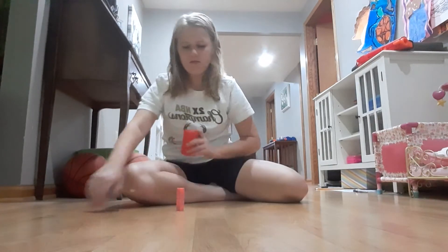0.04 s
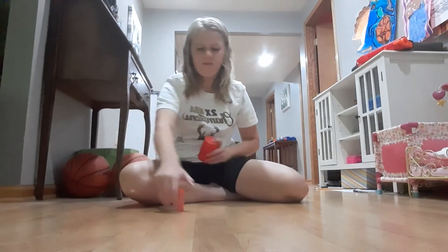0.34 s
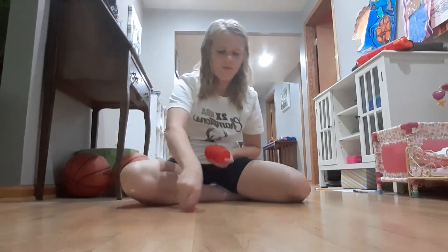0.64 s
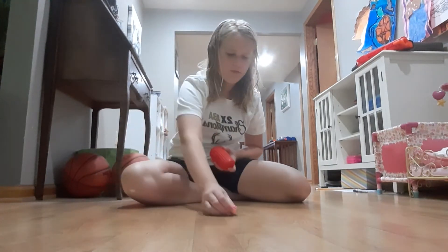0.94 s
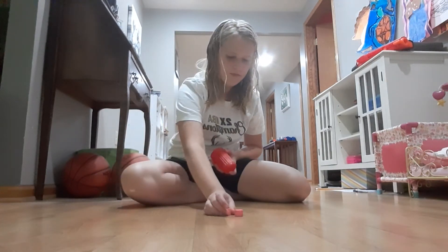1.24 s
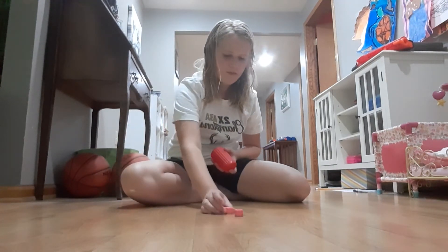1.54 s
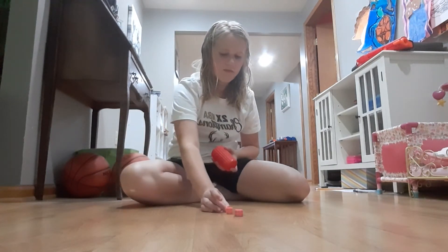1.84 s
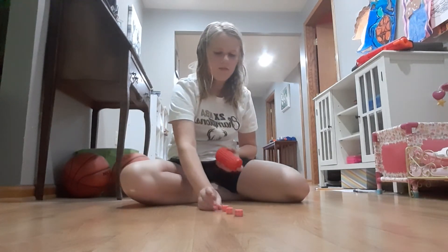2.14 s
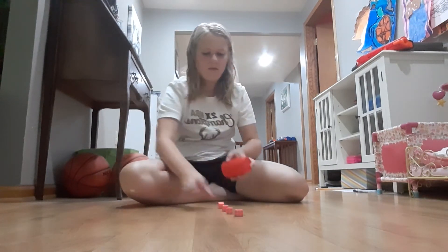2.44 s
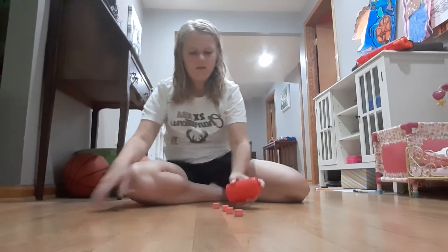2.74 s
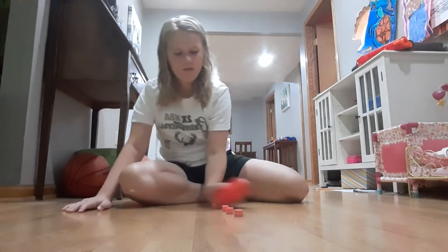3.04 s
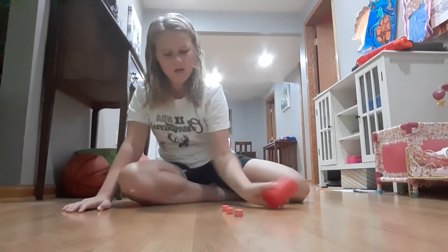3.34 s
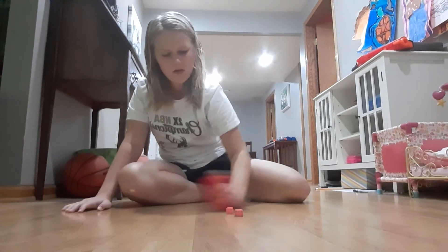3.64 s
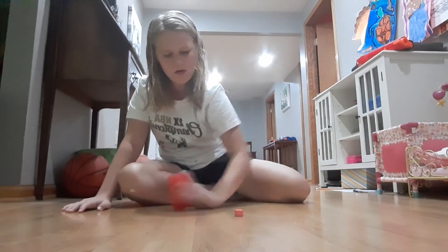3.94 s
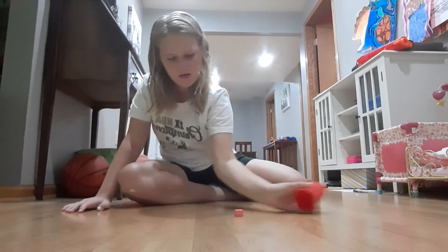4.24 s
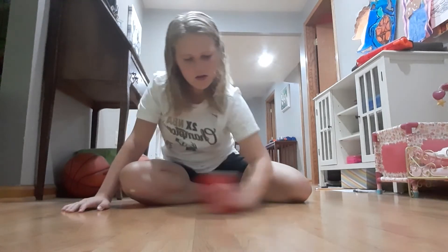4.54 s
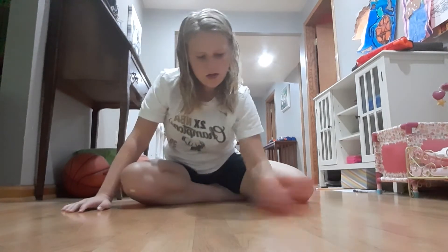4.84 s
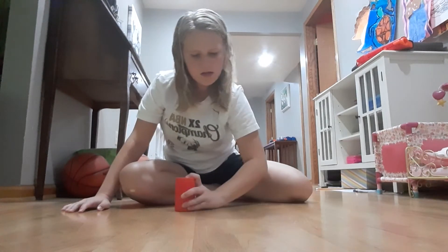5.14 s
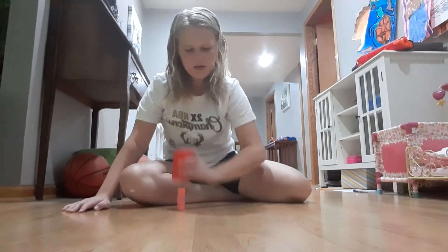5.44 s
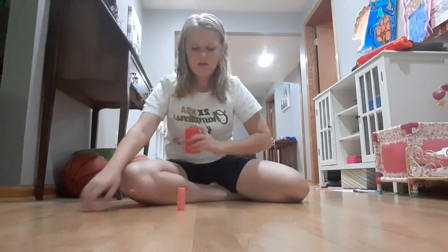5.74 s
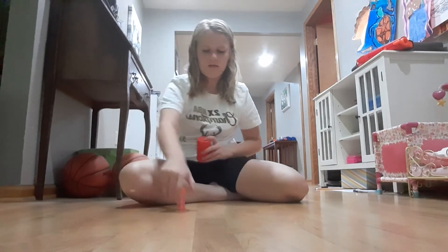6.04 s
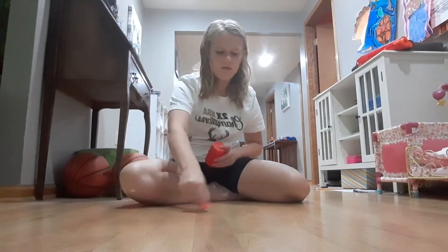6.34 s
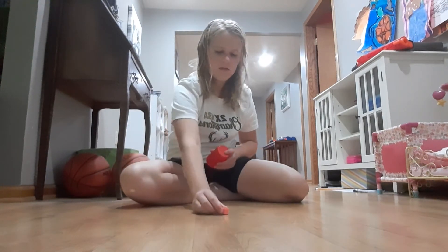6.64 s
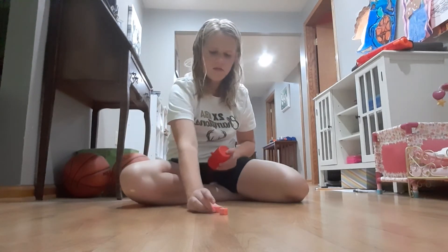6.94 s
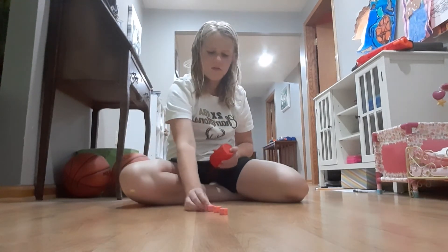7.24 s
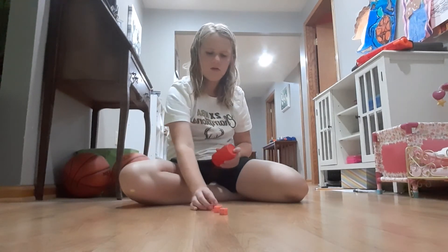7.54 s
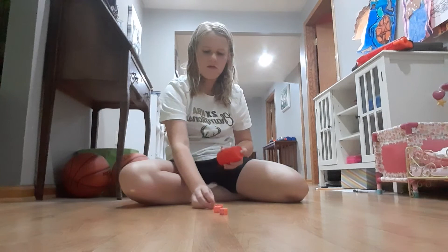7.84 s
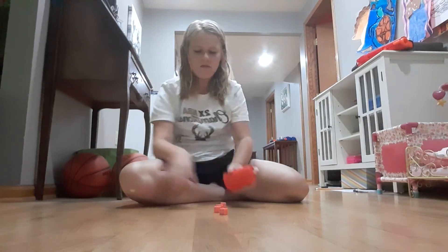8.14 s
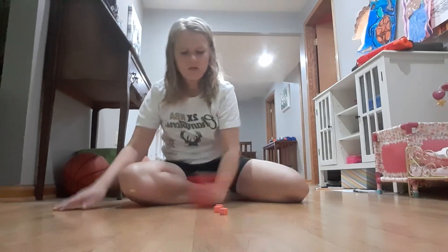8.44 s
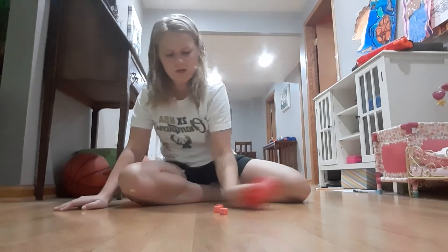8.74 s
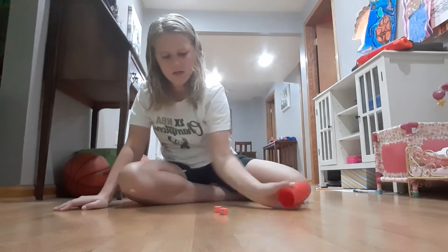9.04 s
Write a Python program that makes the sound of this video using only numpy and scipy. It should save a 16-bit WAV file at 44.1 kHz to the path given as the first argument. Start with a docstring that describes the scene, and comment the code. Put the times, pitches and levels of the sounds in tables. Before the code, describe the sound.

Over a faint house hush and hum, a couple of soft touches on a wooden floor come at about 0.5 seconds. From 0.9 to 1.5 seconds dice click on the boards in a quick cluster, followed by lighter taps and slides until 2.7. At about 3 seconds a plastic cup starts scraping across the floor in quick strokes, roughly two a second, with dice rattling loudly inside: hollow knocks and sharp plastic cracks, with faint low thuds of shifting weight beneath. The cup settles with a few knocks and a short scrape by 5 seconds. After a lull, soft sliding begins near 6.2, and dice click on the floor again from 6.6 to 7.8, loudest around 6.8. From 8.4 seconds two more loud scraping, rattling strokes run until just after 9. Everything sounds close, with a short room echo.

```python
"""Dice stacking on a wooden floor.

In a bare, ringing room a dice tower is knocked over and the dice are set in a row, clicking on the boards.
A plastic cup scrapes across the floor, scoops them up and rattles them into a new tower; each blow rings
its hollow and its wall. The tower falls again and the shaking starts anew.
Underneath: soft thuds of shifting weight, house hush and a faint hum."""
import sys
import numpy as np
from scipy import signal
from scipy.fft import rfft, irfft, next_fast_len
from scipy.io import wavfile
from scipy.ndimage import uniform_filter1d, minimum_filter1d

SR = 44100
rng = np.random.default_rng(int(sys.argv[2]) if len(sys.argv) > 2 else 0)


def waveform_to_disk(signal):
    """Save audio, clipped to [-1, 1], as 16-bit WAV at the path in sys.argv[1]."""
    frames = np.transpose(np.atleast_2d(signal))
    scaled = np.clip(frames, -1, 1) * 32767
    samples = np.round(scaled).astype(np.int16)
    wavfile.write(sys.argv[1], SR, samples)


N = 401736
TAPS = 2048
AGE_S, BIN_HZ = np.arange(TAPS) / SR, np.fft.rfftfreq(TAPS, 1 / SR)

# Dice and floor striking the cup: start_s, level_db, wall_over_hollow_db, tick_db, lead_hz
CUP_BLOWS = [(2.875, -35.5, -26, -59, 480.4), (2.905, -27, -29, -51.5, 476),
             (2.925, -25.5, -19.5, -45.5, 501.4), (3.1005, -5.5, -7, -19, 649), (3.125, -18, -9, -29, 670),
             (3.1455, -7, -15, -14, 667), (3.166, -17, -8, -16.5, 510), (3.2067, -14, -10.5, -10, 606),
             (3.2153, 0, 17, -8.5, 2116), (3.227, -4.5, 23.5, -26, 1942),
             (3.3135, -15.5, -3.5, -14.5, 470.7), (3.3734, -3, 21, -17.5, 2340),
             (3.5094, -10, -6, -13, 678), (3.5805, -5, -11, -14.5, 574), (3.643, -21.5, 0, -21, 2430),
             (3.6507, -4.5, 6, -7, 2440), (3.686, -11, -6, -20, 647), (3.75, -11, 10.5, -22, 2280),
             (3.773, -13, 24, -20, 2390), (3.919, -11, -3, -12, 692), (3.932, -11, -3.5, -24.5, 664),
             (3.991, -4, -10.5, -3.5, 560), (4.023, -7.5, 35, -10.5, 2320), (4.037, -6, 26.5, -12, 2360),
             (4.053, -9.5, 28, -25, 2330), (4.1415, -7.5, -12, -42, 611), (4.1725, -17, -3.5, -26, 616),
             (4.2164, -10, 15, -19.5, 2384), (4.3724, -6, -7, -18, 577), (4.432, -11.5, -2, -18.5, 2140),
             (4.477, -11, 6, -10, 2340), (4.49, -8, 8, -21, 2220), (4.6209, -12, -3, -27, 580),
             (8.4455, -5.5, -8.5, -21, 634.5), (8.452, -11.5, -11, -15.5, 640),
             (8.5005, -11.5, -22, -15, 649), (8.5185, -8, -5.5, -12.5, 634), (8.5427, -4.5, 16, -15, 2105),
             (8.555, 0, 24, -28, 2105), (8.5665, -10, 20, -27, 2420), (8.6596, -8, 13, -20, 2051),
             (8.8098, -6.5, -11.5, -14.5, 584.6), (8.8639, -7.5, -31, -17, 633), (8.888, -4, 27, -5, 2240),
             (8.8915, -5, 30, -28, 2245), (8.8985, -3.5, 25, -31, 2140), (8.903, -6, 29, -29, 2070),
             (8.9155, -7, 26, -30, 2320), (8.9735, -10, -4, -19, 645), (9.0068, -8.5, 25, -20, 2120),
             (9.0243, -6, 44, -17.5, 2326)]
# Cup strokes over the floor: start_s, length_s, hollow_db, wall_db, scrape_db
CUP_STROKES = [(3.076, 0.36, -22, -14, -33), (3.472, 0.35, -17, -17, -31), (3.898, 0.33, -18, -14, -29.5),
               (4.358, 0.17, -14, -8.5, -26.5), (4.538, 0.15, -21.5, -26.5, -31.5),
               (4.801, .22, -31.5, -25, -30), (8.412, 0.31, -18.5, -12.5, -31.5),
               (8.76, .32, -19, -9.5, -29.5)]
# Weak upper cup modes: pitch_hz, level_db, t60_s
UPPER_MODES = [(4010, -9.5, 0.02), (4850, -5.5, 0.012), (7550, -14, 0.022)]
# Die-on-plastic crack spectrum: freq_hz, gain_db
CRACK_SPECTRUM = [(300, -24), (550, 5), (1500, 12), (2900, 7), (3700, 0.5), (6500, -2), (10000, -9.5),
                  (13300, -8.5), (16000, -16)]
# Dice, hand or rim landing on the floor: start_s, level_db, bass_db, treble_db
LANDINGS = [(0.409, -25.5, 26.5, 2.5), (0.472, -25.5, 19, -8), (0.9282, -10, 2.5, -3.5),
            (0.9386, -8, -1, -3.5), (0.9845, -6, 2, -10.5), (1.019, -3, 0, -3), (1.0409, -14, -1, -2.5),
            (1.0511, -17, -6, -1), (1.0561, -9.5, -1.5, 1), (1.091, -18.5, 9, -4), (1.1367, -18.5, 6, -10),
            (1.1949, -15.5, 0.5, 1.5), (1.2219, -25.5, 1.5, -5), (1.354, -18.0, -3, -3),
            (1.3844, -12.5, 2, -17), (1.418, -10.5, 0.5, -3), (1.4419, -11, -0.5, 1.5), (1.456, -17, 3, 2),
            (1.4682, -15, 1.5, 0), (1.4759, -21.5, 1, 4), (1.4816, -20, 4, -6), (1.492, -18, -2.0, 3),
            (1.779, -34, 4.5, -10), (2.137, -21.5, 3, -2), (2.346, -19, 1, -1.5), (2.3713, -23, 4.5, -2),
            (2.4608, -18.5, -5.5, 6.5), (2.5317, -25, 0.5, 0), (2.5915, -19, 4, 4), (2.6352, -21, 11, 8.5),
            (2.6628, -26.5, 6, 4), (2.684, -28, 2, -4.5), (3.5102, -7.5, 4.5, -10), (4.1405, -9, 12, -8),
            (4.621, -13, 8.5, -12), (4.6636, -5, 5.5, -24.5), (4.6959, -7, -2.5, -0.5), (4.709, -10, 2, 1),
            (4.712, -6, 1.5, 2), (4.8686, -8.5, 6, -3), (4.903, -9.5, 15, -6.5), (4.916, -14, 7.5, 5),
            (6.197, -31, 15.5, -8), (6.616, -22.5, 4.5, -2), (6.6922, -21, 6.5, 2), (6.711, -28, -0.5, 0),
            (6.754, -11.5, 1.5, 3), (6.768, -12.5, -1, 6.5), (6.8332, -5.5, -1.5, 4.5),
            (6.838, -4.5, 0, 5.0), (6.9222, -18.5, -8, -6.5), (6.957, -23.5, -6, -5),
            (6.9885, -9, -1, -3.5), (6.995, -23.5, 14, -4), (7.0466, -15.5, 1, -2), (7.097, -19.5, -4, -1),
            (7.1548, -19, -2.5, 6.5), (7.3503, -27.5, 4.5, -2), (7.3888, -28.5, -4, -5),
            (7.7601, -15, 0.5, 8)]
# Floorboard click spectrum: freq_hz, gain_db
BOARD_SPECTRUM = [(130, -20.5), (300, -11.5), (450, 6), (600, 6.5), (850, -8), (1300, 1), (1600, -0.5),
                  (1900, 4.5), (2500, -1), (3000, 1), (3500, -0.5), (4000, -3.5), (4500, -4.5), (5100, -11),
                  (6500, -14.5), (8500, -29), (12500, -34.5), (16000, -47.5)]
# Rim scrape spectrum: freq_hz, gain_db
RIM_SPECTRUM = [(130, -21.5), (310, -13), (480, -5.5), (700, -1.5), (900, 0), (1400, 5), (2200, 7.5),
                (3000, 0), (3750, -5), (4750, -5.5), (5800, -13.5), (8000, -19.5), (16000, -28)]
# Dice, hand or cup rim pushed over the floor: centre_s, length_s, level_db, chatter_hz
FLOOR_PUSHES = [(0.652, 0.17, -42, 535), (0.699, 0.043, -40, 3900), (2.135, 0.32, -49, 1450),
                (2.319, 0.19, -40.5, 1450), (2.727, 0.097, -37, 3360), (3.505, 0.085, -20.5, 3170),
                (3.718, 0.08, -23, 1500), (3.91, 0.038, -19, 3170), (8.521, 0.091, -22.5, 1500),
                (4.178, 0.089, -21, 1890), (4.872, 0.11, -29.5, 2840), (5.58, 0.043, -60.5, 520),
                (6.283, 0.1, -49, 2000), (6.334, 0.059, -38, 2020), (6.996, 0.52, -38, 2010),
                (7.164, 0.064, -35, 2960), (4.772, 0.13, -33, 1550), (7.788, 0.036, -31, 3030),
                (7.934, 0.058, -41.5, 1766), (7.355, 0.049, -43.5, 2620), (8.441, 0.043, -21.5, 3212),
                (8.784, 0.056, -23.5, 3443)]
# Push rasp spectrum: freq_hz, gain_db
RASP_SPECTRUM = [(150, -5), (310, -4.5), (480, 12.5), (900, 3.5), (1900, 2), (4200, -7), (5600, -13.5),
                 (8000, -28.5), (16000, -33)]
# Body weight bumping the floor: start_s, level_db, pitch_hz
BODY_BUMPS = [(2.135, -54, 114), (2.16, -54, 66.7), (3.39, -47, 64.3), (3.85, -43.5, 70)]
# Room tail decay: freq_hz, t60_s
TAIL_DECAY = [(150, 0.65), (500, 0.26), (1400, 0.38), (2300, 0.44), (4000, 0.43), (8000, 0.34),
              (15000, 0.19)]
# Room tail spectrum: freq_hz, gain_db
TAIL_SPECTRUM = [(150, 1.5), (500, 3.5), (1000, 3), (2200, -2), (4000, -5), (8000, 5), (15000, 4.5)]
# Ceiling, wall and furniture echoes: delay_s, level_db
NEAR_ECHOES = [(.0065, -20.5), (0.0118, -16), (.0142, -26.5), (.0175, -26), (0.0248, -39.5), (.0288, -20.5),
               (.043, -28.5)]
# House hush spectrum: freq_hz, gain_db
HUSH_SPECTRUM = [(25, -31.5), (55, -6), (90, -12.5), (125, -7.5), (240, -16.5), (330, -9.5), (410, -16.5),
                 (550, -10), (900, -16), (1500, -23.5), (2300, -17.5), (3300, -36), (16000, -40.5)]
# Mains and appliance hum: pitch_hz, level_db
HUM_TONES = [(120, -75), (2140, -86)]


def cup_knocks(detune=0.018, blunt_db=25, blunt_t60_s=0.047, sharp_t60_s=0.015):
    """Hard blows on the cup; a blunt one, with a weak tick, lets the hollow note ring on."""
    out = np.zeros(N)
    for start_s, db, wall_db, tick_db, lead_hz in CUP_BLOWS:
        notes_hz = cup_notes_hz(start_s) * (1 + detune * rng.standard_normal(2))
        notes_hz[np.argmin(abs(notes_hz - lead_hz))] = lead_hz  # set by where the die strikes
        hollow_hz, wall_hz = notes_hz
        t60_s = blunt_t60_s if db - tick_db > blunt_db else sharp_t60_s
        body = cup_body(db - max(wall_db, 0), hollow_hz, db + min(wall_db, 0), wall_hz, t60_s)
        add(out, start_s, body + gain_of(tick_db) * cup_tick())
    return gain_of(1.5) * out


def cup_body(hollow_db, hollow_hz, wall_db, wall_hz, hollow_t60_s=0.021):
    """Hollow note and wall ring of the cup, each with a faint, longer partner."""
    hollow = mode(hollow_hz, t60_s=hollow_t60_s, rise_s=0.0036)
    hollow += gain_of(-16) * mode(hollow_hz * rng.uniform(.75, 1.22), t60_s=0.14, rise_s=0.0073)
    hollow += gain_of(-10.5) * mode(hollow_hz * .78, t60_s=0.018, rise_s=0.0017)  # floor under the rim
    wall = mode(wall_hz, t60_s=0.015, rise_s=0.00052)
    wall += gain_of(-14.5) * mode(rng.uniform(2050, 2420), t60_s=0.14, rise_s=0.0012)
    wall += gain_of(-23.5) * mode(rng.normal(4750, 140), t60_s=0.03, rise_s=0.0014)  # overtone
    return gain_of(hollow_db) * hollow + gain_of(wall_db) * wall


def cup_tick(rise_s=0.00077, decay_s=0.0029):
    """Hard die on plastic: a crack plus brief upper modes."""
    colour = impulse(read(CRACK_SPECTRUM, BIN_HZ))
    burst = (1 - np.exp(-AGE_S / rise_s)) * np.exp(-AGE_S / decay_s)
    crack = signal.fftconvolve(rng.standard_normal(TAPS) * burst, colour)[:TAPS]
    upper = sum(gain_of(rng.normal(db, 2.7)) * mode(hz * rng.normal(1, 0.023), t60_s)
                for hz, db, t60_s in UPPER_MODES)
    return unit_crest(crack) + gain_of(-8.5) * upper


def cup_notes_hz(at_s, hollow_hz=700.6, sag=0.095, wall_hz=2146, climb=0.076):
    """The hollow note sags mid-stroke, with the rim closest to the floor; the wall ring climbs."""
    begun = [row for row in CUP_STROKES if row[0] <= max(at_s, CUP_STROKES[0][0])]
    start_s, length_s, *_ = begun[-1]
    progress = np.clip((at_s - start_s) / length_s, 0, 1)
    return np.array([hollow_hz * (1 - sag * np.sin(np.pi * progress)), wall_hz * (1 + climb * progress)])


def stroke_speed(age_s, length_s, attack_s=0.0066, release_s=0.069):
    """Cup speed, 0 to 1: rise, hold, fall."""
    return np.clip(age_s / attack_s, 0, 1) * np.clip((length_s - age_s) / release_s, 0, 1)


def rim_touchdowns():
    """The rim meets the floor with a light knock as each stroke opens."""
    out = np.zeros(N)
    for start_s, _, hollow_db, wall_db, scrape_db in CUP_STROKES:
        hollow_hz, wall_hz = cup_notes_hz(start_s)
        body = cup_body(hollow_db - 2, hollow_hz, min(wall_db, hollow_db) - 7, wall_hz)
        tick = gain_of(min(scrape_db, hollow_db - 12) - 3) * cup_tick()
        add(out, start_s, body + tick)
    return out


def dice_rattle(rate_hz=78, spread_db=4.5, shift_db=5, flight_s=0.0086, flight_db=-11):
    """Dice chatter round the cup, shifting from hollow note to wall ring through each stroke."""
    out, ticks = np.zeros(N), [cup_tick() for _ in range(24)]
    blows_s = np.transpose(CUP_BLOWS)[0]
    for start_s, length_s, *levels_db in CUP_STROKES:
        for age_s in np.arange(0, length_s, 1 / rate_hz):
            at_s = start_s + age_s
            # dice are airborne just before a hard blow
            flying = np.exp(-((blows_s - flight_s - at_s) / flight_s) ** 2).max()
            offsets_db = spread_db * np.minimum(rng.standard_normal(3), 1) + flight_db * flying
            hollow_db, wall_db, scrape_db = levels_db + offsets_db
            tilt_db = shift_db * (age_s / length_s - .5)
            hollow_hz, wall_hz = rng.uniform(470, 756), rng.uniform(2000, 2450)
            body = cup_body(hollow_db - 4.5 - tilt_db, hollow_hz, wall_db - 7 + tilt_db, wall_hz)
            tick = gain_of(scrape_db - 7) * ticks[rng.integers(len(ticks))]
            add(out, at_s + rng.random() / rate_hz, stroke_speed(age_s, length_s) * (body + tick))
    return out


def floor_clicks(bass_lag_s=0.0021, scatter_s=0.0043, scatter_hz=1400, ring_hz=1950,
                 bite_hz=(2980, 4100)):
    """Clicks spread through the boards; bending waves carry treble ahead of bass."""
    out = np.zeros(N)
    delay_s = bass_lag_s / (1 + (BIN_HZ / 1700) ** 2)
    dispersion = np.exp(-2j * np.pi * np.cumsum(delay_s) * SR / TAPS)
    bass_shelf = 1 / (1 + (BIN_HZ / 1150) ** 4)
    treble_shelf = 1 - 1 / (1 + (BIN_HZ / 5000) ** 8)
    for start_s, db, bass_db, treble_db in LANDINGS:
        # corners and edges land a moment apart
        scatter = 0.23 * rng.standard_normal(TAPS) * np.exp(-AGE_S / scatter_s)
        contact = 1 + rfft(scatter) * BIN_HZ / (BIN_HZ + scatter_hz)
        colour = impulse(read(BOARD_SPECTRUM, BIN_HZ) + bass_db * bass_shelf + treble_db * treble_shelf)
        board_ring = mode(ring_hz * rng.normal(1, 0.016), t60_s=0.26, rise_s=0.001)
        board_ring *= gain_of(-21 + 0.5 * db)  # firm blows ring most
        edge_bite = sum(mode(hz * rng.normal(1, .02), t60_s=0.022) for hz in bite_hz)
        click = unit_crest(irfft(contact * rfft(colour) * dispersion))
        click += gain_of(-9.5 - max(bass_db, 0)) * edge_bite
        if bass_db > 12:  # a soft touch presses on the boards
            press = rng.standard_normal(TAPS) * AGE_S * np.exp(-AGE_S / 0.0029)
            click = signal.fftconvolve(click, press)[:TAPS]
        add(out, start_s, gain_of(db) * (unit_crest(click) + board_ring))
    return gain_of(-0.18) * out


def friction(rim_db=3.5, uneven_db=3.0, chatter_q=3.2, chatter_gain=2.1, overtone_gain=0.55):
    """Under uneven hand pressure the rim scrapes and each push rasps at a resonance and its octave."""
    time_s = np.arange(N) / SR
    strokes = sum(gain_of(db) * stroke_speed(time_s - start_s, length_s) ** 0.99
                  for start_s, length_s, _, _, db in CUP_STROKES)
    rim = gain_of(rim_db) * strokes * stick_slip(RIM_SPECTRUM, grain_db=0.5)
    rasp = stick_slip(RASP_SPECTRUM, grain_db=2.0)
    pressure = gain_of(uneven_db * unit_rms(uniform_filter1d(rng.standard_normal(N), size=500)))
    out = rim * unit_rms(pressure)
    rasp *= pressure
    for centre_s, length_s, db, hz in FLOOR_PUSHES:
        start_s = centre_s - length_s / 2
        grain = rasp[round(start_s * SR):][:round(length_s * SR)]
        edge, octave = [signal.lfilter(*signal.iirpeak(k * hz, chatter_q, fs=SR), grain) for k in (1, 2)]
        push = unit_rms(grain + chatter_gain * (edge + overtone_gain * octave))
        add(out, start_s, gain_of(db) * np.hanning(len(grain)) * push)
    return out


def stick_slip(spectrum, grain_db, rate_hz=9000):
    """Plastic catches and slips on the wood grain."""
    sizes = gain_of(grain_db * np.minimum(rng.exponential(1, N), 4))
    slipping = rng.random(N) < rate_hz / SR
    return tinted(sizes * slipping * rng.standard_normal(N), spectrum)


def floor_thuds(rise_s=0.01005, decay_s=0.1):
    """Shifting weight booms faintly in two floor modes."""
    out, age_s = np.zeros(N), np.arange(SR // 2) / SR
    swell = (1 - np.exp(-age_s / rise_s)) * np.exp(-age_s / decay_s)
    for start_s, db, hz in BODY_BUMPS:
        phase = 2 * np.pi * hz * age_s
        add(out, start_s, gain_of(db) * swell * (np.sin(phase) + 0.78 * np.sin(1.7 * phase)))
    return out


def room(x, tail_db=-6.5, echo_db=-1, build_s=0.0055):
    """Near echoes, then a dense tail with a decay time per band."""
    hz, age_s, bands = signal.stft(rng.standard_normal(SR), SR, nperseg=256)
    bands *= gain_of(read(TAIL_SPECTRUM, hz)[:, None] - 60 * age_s / read(TAIL_DECAY, hz)[:, None])
    tail = signal.istft(bands, SR, nperseg=256)[1][:SR]
    tail *= 1 - np.exp(-np.arange(SR) / SR / build_s)
    response = gain_of(tail_db) * tail / np.linalg.norm(tail)
    for delay_s, db in NEAR_ECHOES:
        add(response, delay_s, gain_of(db + echo_db) * np.array([.15, .7, .15]))  # slightly dulled
    return signal.oaconvolve(x, response)[:N]


def house_hush(hush_db=-65.5):
    """Steady hush with mains and appliance hum."""
    time_s = np.arange(N) / SR
    hum = sum(gain_of(db) * np.sqrt(2) * np.sin(2 * np.pi * (hz * time_s + rng.random()))
              for hz, db in HUM_TONES)
    return gain_of(hush_db) * tinted(rng.standard_normal(N), HUSH_SPECTRUM) + hum


def mode(hz, t60_s, rise_s=0.0001):
    """Damped resonance, random phase, envelope peak 1."""
    envelope = (1 - np.exp(-AGE_S / rise_s)) ** 2 * gain_of(-60 * AGE_S / t60_s)
    envelope *= np.cos(np.pi / 2 * (AGE_S / AGE_S[-1]) ** 2)  # end fade
    return envelope / envelope.max() * np.sin(2 * np.pi * (hz * AGE_S + rng.random()))


def impulse(spectrum_db):
    """Minimum-phase click with this spectrum."""
    log_gain = np.log(gain_of(np.r_[spectrum_db, spectrum_db[-2:0:-1]]))
    return np.fft.ifft(np.exp(np.conj(signal.hilbert(log_gain)))).real


def tinted(x, spectrum):
    """Filter by a spectrum; rms 1."""
    size = next_fast_len(N)
    gains = gain_of(read(spectrum, np.fft.rfftfreq(size, 1 / SR)))
    return unit_rms(irfft(rfft(x, size) * gains, size)[:N])


def read(points, hz):
    """Interpolate (freq_hz, value) points over log frequency."""
    freq_hz, values = np.transpose(points)
    return np.interp(np.log(hz + 1), np.log(freq_hz + 1), values)


def add(mix, start_s, sound):
    """Mix in place."""
    part = mix[max(round(start_s * SR), 0):][:len(sound)]
    part += sound[:len(part)]


def gain_of(db):
    """Decibels to amplitude."""
    return 10 ** (np.asarray(db) / 20)


def unit_rms(x):
    """Scale to rms 1."""
    return x / np.sqrt(np.mean(x ** 2) + 1e-20)


def unit_crest(x):
    """Scale the loudest 32 samples to the power of a unit sine."""
    return x / np.sqrt(2 * uniform_filter1d(x ** 2, size=32).max() + 1e-20)


def scene(low_cut_hz=190, floor_send_db=1):
    """Cup, dice and floor in the room; small objects radiate little bass."""
    low_cut = signal.butter(2, low_cut_hz, "highpass", fs=SR, output="sos")
    cup = signal.sosfilt(low_cut, cup_knocks() + rim_touchdowns() + dice_rattle() + friction())
    floor = signal.sosfilt(low_cut, floor_clicks())
    reverb = room(cup + gain_of(floor_send_db) * floor)
    return (cup + floor + reverb + floor_thuds() + house_hush())[None]


def record(dry, limiter_samples=130, cutoff_hz=16000):
    """Fast limiter at full scale, then low-pass."""
    allowed = 1 / np.maximum(abs(dry), 1)
    gain = uniform_filter1d(minimum_filter1d(allowed, size=limiter_samples), size=limiter_samples)
    low_pass = signal.firwin(255, cutoff_hz, window=("kaiser", 8), fs=SR)
    return signal.oaconvolve(dry * gain, low_pass[None], "same")


dry = scene()
out = record(dry)
waveform_to_disk(out)
```